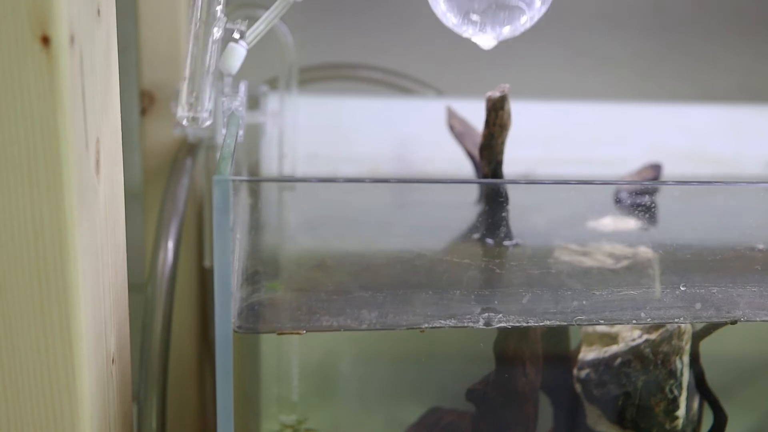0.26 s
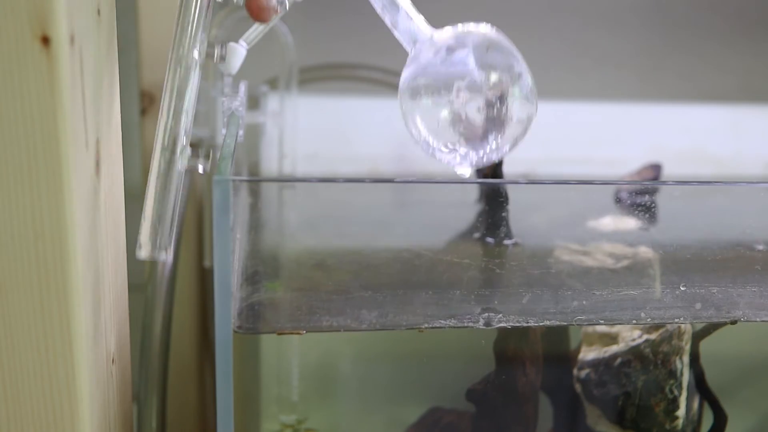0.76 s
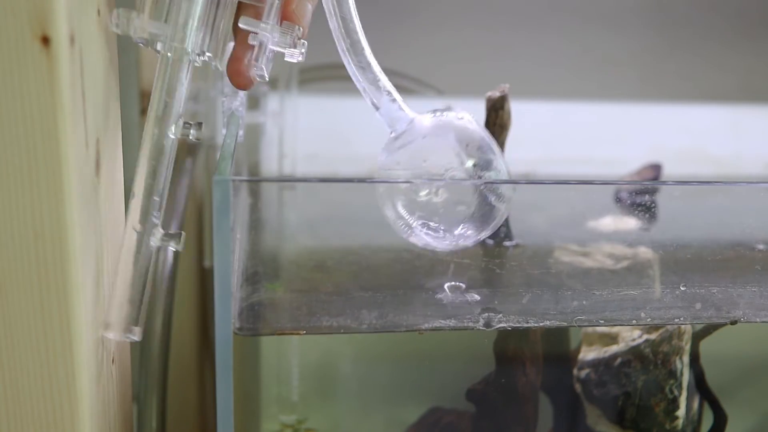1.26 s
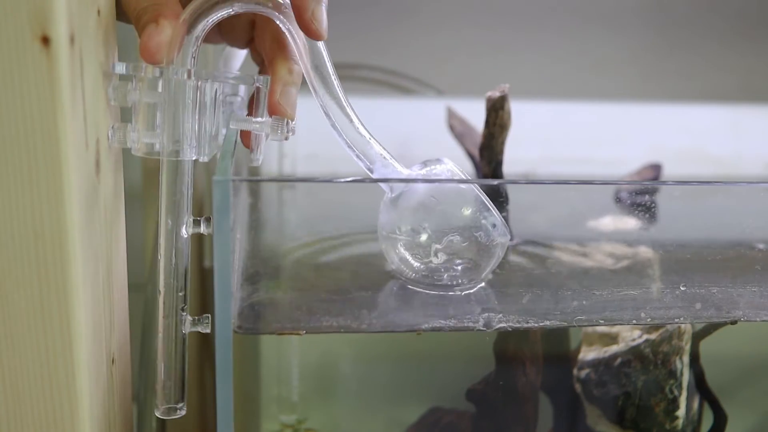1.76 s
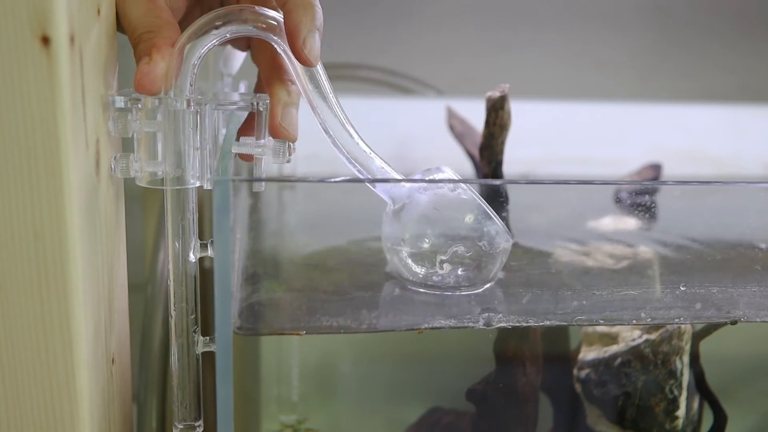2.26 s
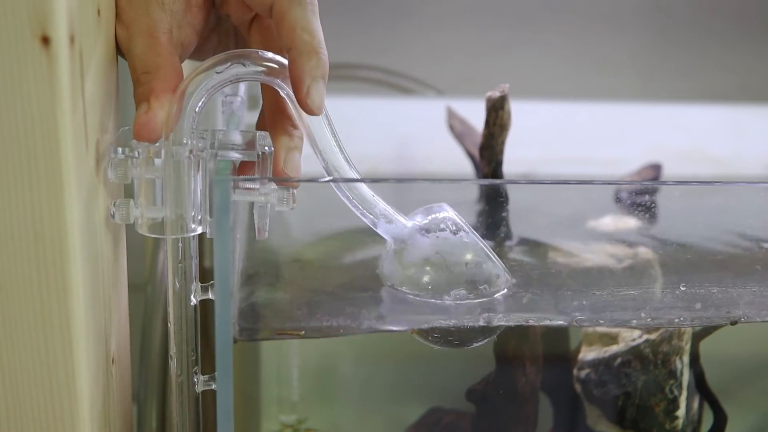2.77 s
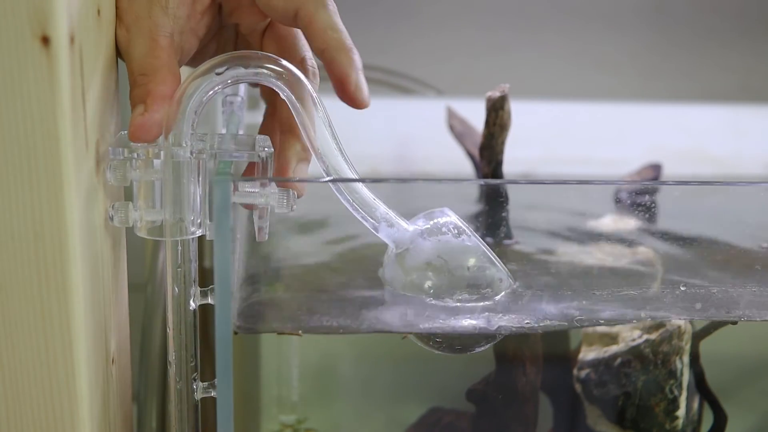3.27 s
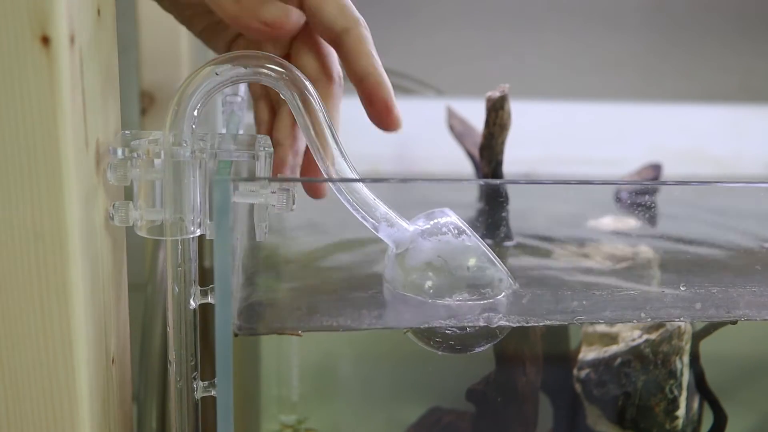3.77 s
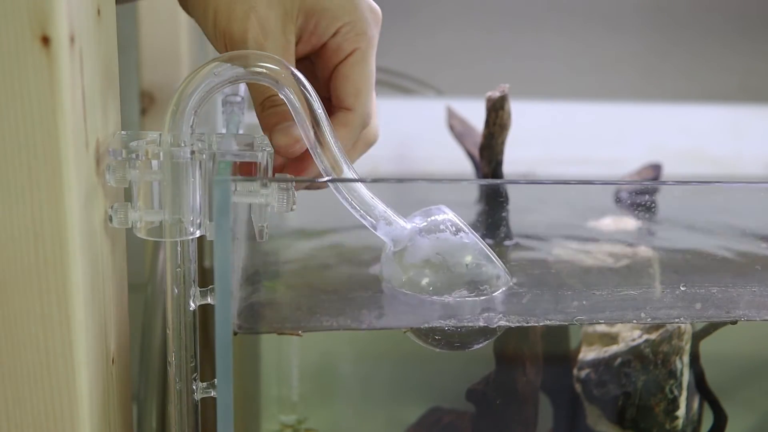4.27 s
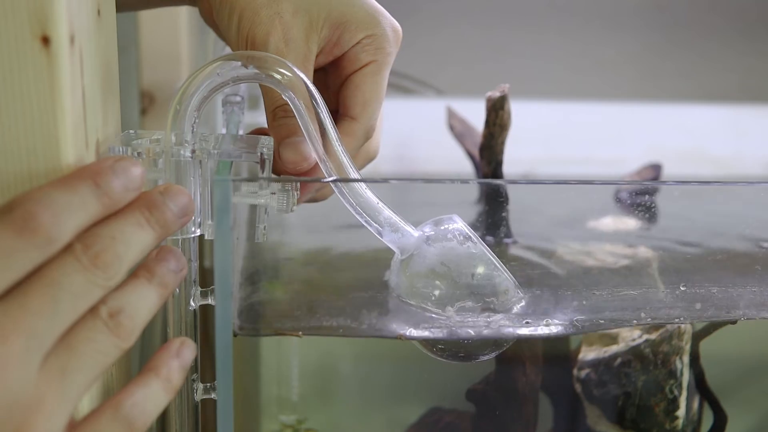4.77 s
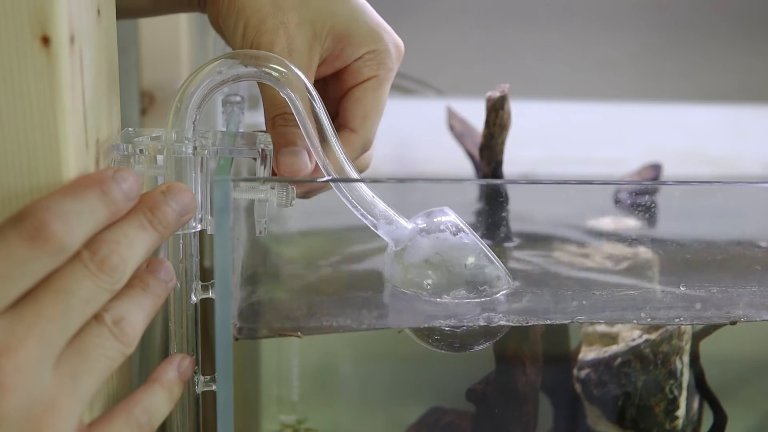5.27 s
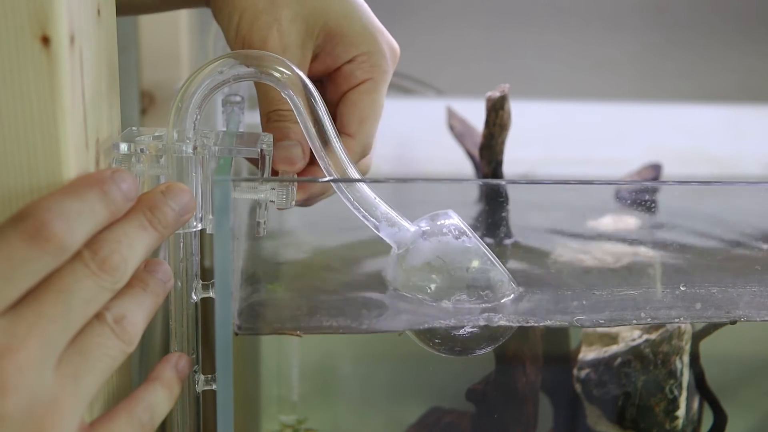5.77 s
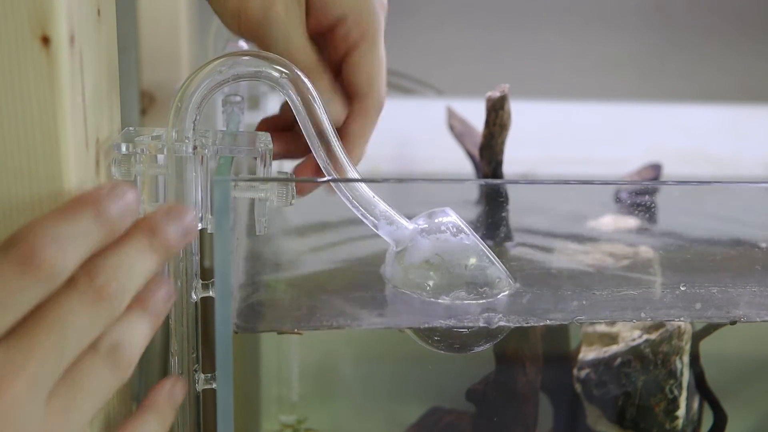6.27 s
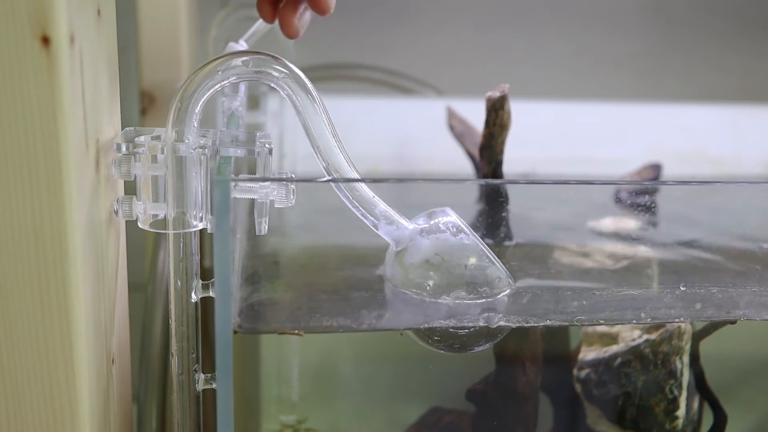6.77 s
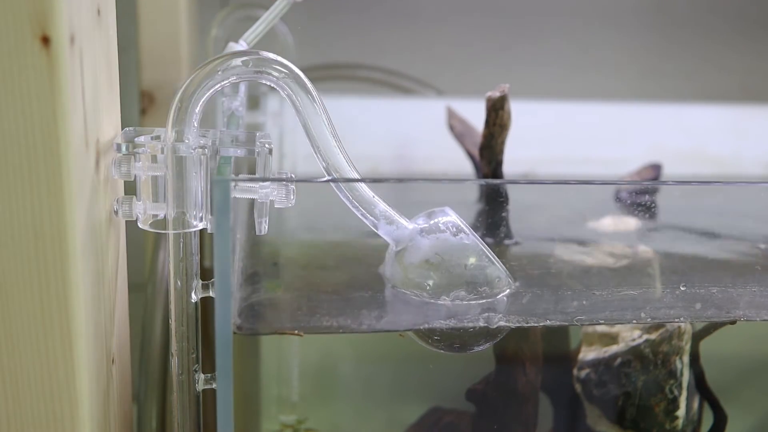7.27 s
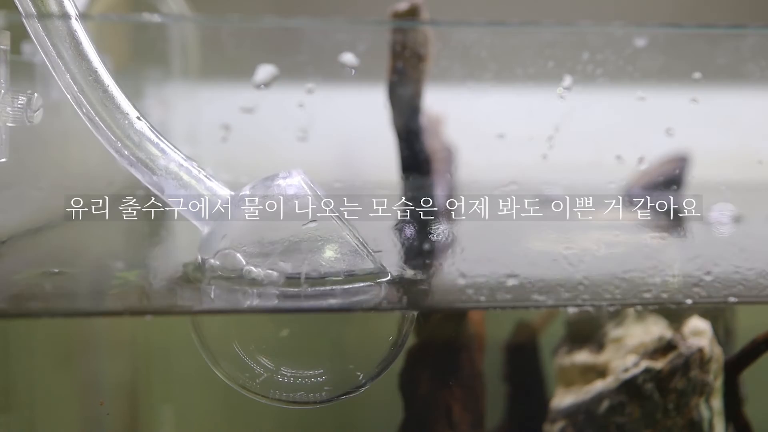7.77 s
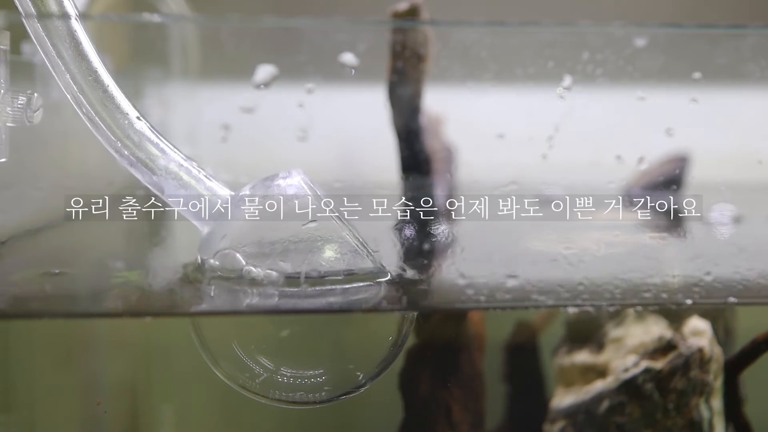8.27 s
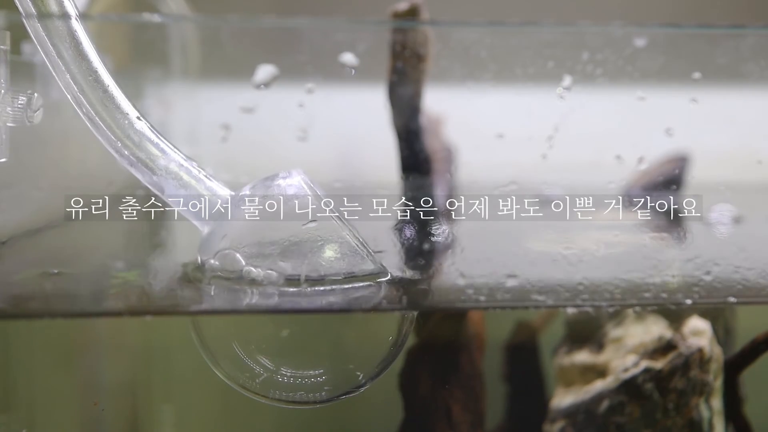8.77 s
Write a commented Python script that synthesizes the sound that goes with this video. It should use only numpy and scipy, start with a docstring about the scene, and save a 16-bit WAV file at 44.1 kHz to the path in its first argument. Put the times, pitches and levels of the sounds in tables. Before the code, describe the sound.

Close, small indoor room: a filter trickles continuously in ringing little bubbles and bright spray ticks above a quiet pump hum. A glass pipe in a hard plastic clamp knocks the tank rim in several rattly clicks during the first three and a half seconds. A brief screw squeak follows at about five seconds, two faint clicks at six, then a dull bump and airy water hiss begin near eight.

```python
"""A glass outflow pipe in a plastic clamp knocks on the rim of an aquarium; its screw squeaks once.
Knocks are noise cracks and decaying modes kept alive by a loose chatter; the squeak is a harmonic stack.
Nearby a filter trickles: gliding, ringing bubbles and bright ticks of noise. Pumps hum and murmur behind.
Near the end dull bumps on the stand are heard, with a hiss of air and water in the pipe (shaped noise).
Knocks, squeak, trickle and bumps get a short room; hum, murmur and flow are added without it."""
import sys
import numpy as np
from scipy import signal
from scipy.fft import rfft, irfft, next_fast_len
from scipy.io import wavfile

SR = 44100
rng = np.random.default_rng(int(sys.argv[2]) if len(sys.argv) > 2 else 0)


def file_out(sig):
    """Save sig as 16-bit WAV at sys.argv[1]."""
    # one column per channel
    cols = np.atleast_2d(sig).T
    # limit, then scale
    lim = np.clip(cols, -1, 1)
    pcm = np.round(lim * 32767).astype(np.int16)
    wavfile.write(sys.argv[1], SR, pcm)


N = 398223

# Steady mains hum lines. Each row: pitch in Hz, mean level in dB rms.
HUM_LINES = [(60, -60.5), (179.7, -71.5)]
# Slow course of the background. Each row: time in seconds, mean rumble level in dB,
# mean level of the second hum line in dB rms, murmur level in dB.
ROOM_COURSE = [(0.0, -63.5, -58, -54.5), (4.0, -66, -59, -53.5), (5.33, -66, -59.5, -54),
               (5.76, -59, -60, -53.5), (6.3, -67, -59.5, -54), (6.66, -59, -61.5, -54),
               (7.25, -72, -60.5, -53.5), (7.42, -54, -62, -54.5), (7.66, -57, -59.5, -52.5),
               (7.87, -66, -65, -52.5), (8.02, -61, -65, -44.5), (8.35, -67, -69, -52.5),
               (8.65, -64, -67, -51.5), (9.03, -59, -66, -52.5)]
# Spectrum of the murmur of pumps and air. Each row: frequency in Hz, relative level per Hz in dB.
MURMUR_SPECTRUM = [(76, -50), (130, -8), (225, -14), (430, -11), (495, -8.5), (822, -10), (986, -11),
                   (1310, -14), (1600, -11.5), (2050, -16.5), (3470, -19), (4890, -22), (12200, -27),
                   (15500, -28.5), (16500, -50)]
# Cabinet resonances in the murmur. Each row: centre in Hz, width in Hz, lift in dB.
CABINET_RESONANCES = [(498, 20, 4), (999, 40, 7)]
# Course of the flow in the pipe. Each row: time in seconds, hiss level in dB, low churning level in dB.
FLOW_COURSE = [(7.78, -71, -70), (7.838, -51.5, -64), (8.002, -48.5, -53.5), (8.566, -51, -62.5),
               (8.75, -55.5, -71), (9.03, -55, -74)]
# Spectrum of the hiss in the pipe. Each row: frequency in Hz, relative level per Hz in dB.
HISS_SPECTRUM = [(2060, -46), (3500, -17), (4020, -3), (4560, -8.5), (5210, 1.5), (5960, 0.5), (6340, 5),
                 (9130, -4), (10100, -15), (11000, -13.5), (15500, -20), (17000, -50)]

# Bumps on the stand. Each row: start in seconds, relative strength in dB, loudest frequency in Hz,
# fall away from there in dB per octave, extra for the large panel (second colour point) in dB.
STAND_BUMPS = [(7.841, -33, 150, 5, -10), (7.856, -33, 70, 4.5, -12), (7.992, -27.5, 710, 5.5, 8.5),
               (8.036, -36, 440, 22, 8), (8.062, -36, 1700, 4.5, 4)]
# Modes of the stand. Each row: nominal pitch in Hz, relative level in dB, 60 dB decay in seconds.
STAND_MODES = [(69, 6, 0.26), (117, 4.5, 0.2), (176.5, -1.5, 0.18), (444, 6, 0.064), (650, 2.5, 0.12),
               (985, 5, 0.055), (1150, 0, 0.056), (1565, 1, 0.057), (1710, -2.5, 0.043), (1974, 5, 0.031),
               (2360, 0, 0.038), (2670, -2.5, 0.061), (3110, -9, 0.056)]
# Points where the colour of a stand bump is set, in Hz.
STAND_COLOUR_HZ = [70, 120, 190, 440, 670, 1000, 2200]
# Thuds on the tank wall. Each row: start in seconds, relative strength in dB, loudest frequency in Hz,
# fall away from there in dB per octave, extra at the second colour point in dB.
TANK_THUDS = [(1.133, -32, 590, 7.9, 1.5), (1.365, -38.5, 800, 2.5, -26), (1.384, -41.5, 200, 3.5, -21),
              (1.65, -48, 200, 6, -16), (3.429, -48, 590, 9, 1), (3.457, -44, 590, 7, -3),
              (3.489, -59, 1100, 2.5, -9), (4.704, -48.5, 1100, 4.5, -8)]
# Modes of the tank wall. Each row: nominal pitch in Hz, relative level in dB, 60 dB decay in seconds.
TANK_MODES = [(196, 4, 0.089), (335, 3.5, 0.073), (490, -3.5, 0.11), (562.5, -1.5, 0.16), (637, -2, 0.081),
              (705, 0, 0.058), (1100, 2, 0.046), (1130, 4.5, 0.056), (1395, -5.5, 0.11)]
# Points where the colour of a tank thud is set, in Hz.
TANK_COLOUR_HZ = [200, 320, 590, 1100]

# Clearest ticks of bursting spray. Each row: start in seconds, relative level in dB,
# centre in Hz, 60 dB decay in seconds.
SPRAY_TICKS = [(0.208, -42, 6000, 0.09), (0.443, -40.5, 6000, 0.045), (0.9926, -43, 11600, 0.05),
               (2.2633, -35, 5870, 0.05), (2.9322, -40.5, 12600, 0.05), (4.704, -41.5, 7320, 0.045),
               (5.0382, -34.5, 9900, 0.17), (5.8621, -43.5, 10100, 0.05), (6.0521, -39, 8740, 0.035),
               (7.3083, -40, 6400, 0.041), (8.546, -29.5, 6500, 0.05), (8.7094, -40, 6300, 0.05)]
# Clearest bubbles of the trickle. Each row: start in seconds, relative level in dB, starting pitch in Hz.
CLEAR_BUBBLES = [(0.0582, -44, 3840), (0.2417, -44, 1680), (0.3674, -41.5, 2660), (0.5005, -31.5, 1930),
                 (0.6366, -43, 4090), (0.658, -40, 2580), (0.6856, -33, 2580), (0.7214, -40, 2200),
                 (0.8226, -42.5, 4180), (0.9093, -44, 3350), (0.9712, -41.5, 3400), (1.3276, -33.5, 2140),
                 (1.381, -37.5, 2570), (1.5374, -33, 2280), (1.566, -40, 3010), (1.5791, -36, 2000),
                 (1.6169, -41, 3100), (2.2271, -40, 3550), (2.2767, -31.5, 3400), (2.3693, -42, 3800),
                 (2.4028, -37, 4110), (2.4151, -32.5, 1870), (2.452, -39, 3200), (2.604, -33, 2570),
                 (2.7183, -33.5, 1450), (2.9065, -40, 3350), (3.2418, -38, 2610), (3.2687, -41, 1490),
                 (3.2778, -35, 2640), (3.5524, -41, 1630), (3.6624, -33.5, 2190), (3.6807, -37, 2980),
                 (3.7149, -37.5, 2420), (3.773, -42.5, 1400), (3.9205, -34.5, 2420), (3.9563, -36.5, 3360),
                 (4.0017, -37.5, 1520), (4.0265, -35.5, 2640), (4.089, -44, 3430), (4.1187, -30, 2160),
                 (4.1905, -35.5, 1860), (4.192, -44, 2720), (4.1925, -40, 1600), (4.2384, -44, 3450),
                 (4.2615, -38, 3500), (4.303, -35, 2690), (4.3856, -37, 2620), (4.4436, -34, 2580),
                 (4.4632, -35, 2090), (4.4857, -37.5, 1880), (4.5868, -37, 1900), (4.6905, -32.5, 2240),
                 (4.7054, -39, 3830), (4.7595, -45, 2200), (4.9162, -37, 2560), (4.9705, -37, 2380),
                 (5.0846, -43, 2220), (5.1603, -35, 2180), (5.174, -38, 3300), (5.2722, -37, 2520),
                 (5.4756, -41.5, 3520), (5.54, -43, 3650), (5.5913, -38.5, 3010), (5.6345, -45, 3670),
                 (5.7198, -45.5, 3610), (5.835, -43, 3500), (5.9034, -43, 1700), (5.9232, -41, 1550),
                 (6.2591, -32, 2640), (6.4416, -39, 2980), (6.5312, -32.5, 1850), (6.6655, -26.5, 2010),
                 (6.7826, -39, 2220), (6.7986, -35.5, 1490), (6.8391, -42, 3300), (6.9133, -42, 3480),
                 (6.94, -36.5, 2320), (7.0118, -31, 1690), (7.0367, -40, 2700), (7.071, -33, 3000),
                 (7.0979, -43, 4320), (7.2319, -39, 1770), (7.4763, -38.5, 3630), (7.4856, -35.5, 2600),
                 (7.5235, -34.5, 1535), (7.6137, -39.5, 3200), (7.8926, -34, 3450), (7.8965, -40, 1540),
                 (8.1609, -39, 2640), (8.3902, -38.5, 2810), (8.5111, -41.5, 1680), (8.5464, -38.5, 2244),
                 (8.5987, -45, 3040), (8.676, -33.5, 2250), (8.6825, -25, 852), (8.69, -33.5, 1455),
                 (8.7, -38, 2020), (8.7517, -41.5, 2250), (8.8075, -42, 2170), (8.8463, -35, 3020),
                 (8.8695, -33, 2200), (8.9489, -38.5, 3550), (9.003, -34.5, 2710), (9.0147, -32, 2700)]
# Partials of the screw's squeak. Each row: multiple of the pitch, peak level in dB.
SQUEAK_PARTIALS = [(1, -53), (2, -68), (3, -51), (4, -60), (5, -67)]
# Clamp and pipe against the glass. Each row: start in seconds, relative strength in dB, low body in dB
# re strength, ring of the pipe in dB re strength, fall of the treble in dB per octave.
CLAMP_KNOCKS = [(1.064, -19.5, -6, -3, 10), (1.1252, -30.5, 6, 4, 11), (1.1332, -16.5, -22, -11.5, 13),
                (2.0355, -27.5, -22, -4.5, 13.5), (2.0686, -30.5, -25, -9, 12),
                (2.0878, -36.5, -10, -12, 13), (2.1055, -29.5, -23, -8.5, 14.5), (2.135, -45, -7, -15, 21),
                (2.583, -29.5, 8.5, -4.5, 5.5), (2.6166, -16.5, -18, -3, 10), (2.6293, -21, -16.5, -16, 14),
                (2.65, -44, -6, -1.5, 9), (2.9928, -29.5, -35, -12, 15), (3.4316, -32.5, -12, -18, 21),
                (3.462, -31.5, -0.5, -14.5, 21), (3.5054, -34.5, -21, -12, 21), (6.1745, -33, -18, -13, 19),
                (6.19, -32.5, -14.5, -17, 20.5)]
# Modes of clamp and pipe. Each row: nominal pitch in Hz, relative level in dB, 60 dB decay in seconds.
CLAMP_MODES = [(967, 3, 0.037), (1293, 1, 0.1), (2174, -5, 0.036), (2590, -6.5, 0.033), (2730, -9.5, 0.027),
               (3050, 5, 0.018), (3860, 4.5, 0.028), (4200, -20, 0.041), (4600, 0, 0.014),
               (4850, -6.5, .04), (5720, 12.5, 0.025), (6630, -0.5, 0.047), (7430, 5, 0.04),
               (8300, 6, 0.028), (8900, -2, 0.025), (10200, -15, 0.053), (11900, -14.5, 0.031),
               (12100, -4, 0.036)]
# Points where the colour of a knock is set, in Hz: body, middle, peak, pipe, then two in the treble.
KNOCK_COLOUR_HZ = [1100, 2500, 3900, 5800, 8500, 12500]

SECOND_HUM_HZ, RUMBLE_WANDER_DB = 119.6, 2
# Cycles to fall 60 dB at 2 kHz; higher bubbles ring more cycles (power of pitch).
CYCLES_AT_2K, CYCLES_FOLLOW_PITCH = 48.8, 0.71
SQUEAK_S, SQUEAK_LENGTH_S, SQUEAK_HZ = 5.172, 0.038, 2504
# Knock level between body and peak; 60 dB decay of the loose parts' chatter.
KNOCK_MIDDLE_DB, RATTLE_T60_S = -3.5, 0.21
ECHO_S, ECHO_DB, ROOM_T60_S, ROOM_DB = .0068, -12.5, 0.24, -11.5
CUTOFF_HZ = 16700


def amp(db):
    """Decibels to gain."""
    return 10 ** (np.asarray(db) / 20)


def rms_one(x):
    """Scale to unit rms."""
    return x / np.sqrt(np.mean(x ** 2) + 1e-20)


def in_time(rows):
    """Columns of a course, drawn as straight lines with one value per sample."""
    s, *columns = np.transpose(rows)
    return [np.interp(np.arange(N) / SR, s, c) for c in columns]


def drift(rate_hz):
    """Slow random wander of spread 1: low-passed noise, drawn every 40 samples."""
    pole = np.exp(-2 * np.pi * rate_hz * 40 / SR)
    draws = rng.standard_normal(N // 40 + 2002)
    slow = signal.lfilter([1], [1, -2 * pole, pole * pole], draws)[2000:]   # settled part
    return np.interp(np.arange(N) / 40, np.arange(len(slow)), rms_one(slow))


def coloured(spectrum, patchy_db, peaks=()):
    """Noise with a spectrum and resonances; octaves flicker partly together, partly alone; rms 1."""
    size = next_fast_len(N, True)
    hz = np.fft.rfftfreq(size, 1 / SR) + 1   # keeps the logarithm finite
    points_hz, points_db = np.transpose(spectrum)
    gain = amp(np.interp(np.log(hz), np.log(points_hz), points_db, left=-90, right=-90))
    for centre_hz, width_hz, peak_db in peaks:
        gain = gain * amp(peak_db / (1 + (2 * (hz - centre_hz) / width_hz) ** 2))
    shaped = rfft(rng.standard_normal(size)) * gain
    together = drift(5.5)
    octave = np.log2(hz / 125)
    total = np.zeros(N)
    for k in range(8):
        overlap = np.clip(1 - abs(octave - k), 0, 1)
        band = irfft(shaped * overlap, size)[:N]
        total += band * amp(patchy_db * (0.46 * together + drift(24)))
    return rms_one(total)


def add(out, s, sound):
    """Mix a short sound in at s seconds."""
    i = round(s * SR)
    out[i:i + len(sound)] += sound[:max(N - i, 0)]


def ringing(hz, t60, rise_s, glide=0, size=8192):
    """Decaying sines, one row per mode, with a soft start; glide lifts the pitch as they die."""
    t = np.arange(size) / SR
    hz, t60 = np.reshape(hz, (-1, 1)), np.reshape(t60, (-1, 1))
    envelope = (1 - np.exp(-t / rise_s)) * amp(-60 * t / t60)
    return envelope * np.sin(2 * np.pi * hz * t * (1 + glide * t / t60))


def burst(band_hz, band_db, t60, rise_s, size=8192):
    """Coloured noise that starts quickly and dies."""
    hz, t = np.fft.rfftfreq(size, 1 / SR) + 1, np.arange(size) / SR
    edges_hz = [band_hz[0] / 1.6, *band_hz, band_hz[-1] * 1.4]
    colour_db = np.interp(np.log(hz), np.log(edges_hz), [-90, *band_db, -90])
    noise = irfft(rfft(rng.standard_normal(size)) * amp(colour_db))
    return noise * (1 - np.exp(-t / rise_s)) * amp(-60 * t / t60)


def strike(modes, band_hz, band_db, rise_s, size=8192):
    """One blow on a body: given colour, with chance in the strength, sign and pitch of each mode."""
    hz, level_db, t60 = np.transpose(modes)
    strength_luck, sign_luck, pitch_luck = rng.standard_normal((3, len(hz)))
    colour_db = np.interp(np.log(hz), np.log(band_hz), band_db)
    rings = ringing(hz * (1 + .008 * pitch_luck), t60, rise_s, size=size)
    gains = amp(level_db + colour_db + 1.5 * strength_luck) * np.sign(sign_luck)
    return gains @ rings


def background():
    """Mains hum as wandering sines, low rumble as band noise, murmur of pumps and air as coloured noise."""
    rumble_db, second_db, murmur_db = in_time(ROOM_COURSE)
    t = np.arange(N) / SR
    hum = np.zeros(N)
    for hz, level_db in [*HUM_LINES, (SECOND_HUM_HZ, second_db)]:
        hum += np.sqrt(2) * amp(level_db + .5 * drift(2.6)) * np.sin(2 * np.pi * hz * t)
    band = signal.butter(2, [39, 72], "band", fs=SR, output="sos")
    rumble = rms_one(signal.sosfilt(band, rng.standard_normal(N)))
    rumble = amp(rumble_db + RUMBLE_WANDER_DB * drift(1.2)) * rumble
    noise = coloured(MURMUR_SPECTRUM, 1.33, CABINET_RESONANCES)
    low = signal.sosfiltfilt(signal.butter(1, 2000, fs=SR, output="sos"), noise)
    murmur = amp(murmur_db) * low + amp(-56.5) * (noise - low)   # the treble does not follow the course
    return hum + rumble + murmur


def flow():
    """Air and water in the pipe: bright hiss and low churning noise, silent before the first row."""
    fade_in = np.clip((np.arange(N) / SR - FLOW_COURSE[0][0]) / .03, 0, 1)
    hiss_db, churning_db = in_time(FLOW_COURSE)
    band = signal.butter(2, [150, 300], "band", fs=SR, output="sos")
    churning = amp(churning_db) * rms_one(signal.sosfilt(band, rng.standard_normal(N)))
    hiss = amp(hiss_db) * coloured(HISS_SPECTRUM, 1.5, [(6200, 400, 3)])
    return fade_in * (hiss + churning)


def bumps(blows, modes, band_hz, ring_db, scuff_db):
    """Dull blows on a large body: its modes ring softly under a scuff of noise."""
    out = np.zeros(N)
    for s, strength_db, loudest_hz, fall_db, panel_db in blows:
        band_db = strength_db - fall_db * abs(np.log2(np.array(band_hz) / loudest_hz))
        band_db[1] += panel_db
        add(out, s, amp(ring_db) * strike(modes, band_hz, band_db, .0015))
        add(out, s, amp(scuff_db) * burst(band_hz, band_db, .12, .003))
    return out


def ticks(faint_db):
    """Bursting spray: bright noise that dies quickly; faint, shorter ticks come at random."""
    out = np.zeros(N)
    faint = [(u * N / SR, faint_db - 8 * v, 6000 + 8000 * w, .022) for u, v, w in rng.random((120, 3))]
    for s, level_db, hz, t60 in [*SPRAY_TICKS, *faint]:
        size = 4096 if t60 > .04 else 1024
        tick = burst([hz / 1.28, hz, hz * 1.125], [-5, 0, -5], t60, 0.00021, size=size)
        add(out, s, amp(level_db) * tick)
    return out


def bubbles(faint_per_s, faint_db, spray_db):
    """Each drop traps a ringing bubble, a neighbour and a puff of spray; faint ones come at random."""
    out, rise_s = np.zeros(N), .0007
    faint = []
    for when, level, pitch, chance in rng.random((500, 4)):   # about 55 candidates a second
        if chance < faint_per_s / 55:
            faint.append((when * N / SR, faint_db + 9 * (level - 1), 1900 * 2.3 ** pitch))
    for s, level_db, hz in [*CLEAR_BUBBLES, *faint]:
        u, v, w = rng.random(3)
        cycles = CYCLES_AT_2K * (hz / 2000) ** CYCLES_FOLLOW_PITCH
        bubble = ringing(hz, cycles / hz, rise_s, 0.031, size=2048)[0]
        add(out, s, amp(level_db) * bubble)
        neighbour = ringing(hz * (0.731 + 0.554 * u), 35 / hz, rise_s, 0.094, size=2048)[0]
        add(out, s + .012 * v, amp(level_db - 5.5 - 4.5 * w) * neighbour)
        spray = burst([hz / 1.47, hz, hz * 1.63], [-15, 0, -15], 0.044, rise_s, size=2048)
        add(out, s, amp(level_db + spray_db) * spray)
    return out


def squeak():
    """Regular stick-slip of the thread: a steady harmonic stack under a rounded envelope."""
    out, t = np.zeros(N), np.arange(round(SQUEAK_LENGTH_S * SR)) / SR
    stack = sum(amp(db) * np.sin(2 * np.pi * k * SQUEAK_HZ * t) for k, db in SQUEAK_PARTIALS)
    add(out, SQUEAK_S, stack * np.sin(np.pi * t / SQUEAK_LENGTH_S) ** 0.38)
    return out


def knocks():
    """Hard plastic and glass: a short crack, the modes, and a loose chatter that keeps exciting them."""
    out, t = np.zeros(N), np.arange(8192) / SR
    octaves_up = np.log2(np.array(KNOCK_COLOUR_HZ[4:]) / KNOCK_COLOUR_HZ[2])
    for s, strength_db, body_db, pipe_db, fall_db in CLAMP_KNOCKS:
        band_db = list(strength_db + np.r_[body_db, KNOCK_MIDDLE_DB, 0, pipe_db, -fall_db * octaves_up])
        contacts = rng.random(len(t)) < .04   # sparse random clicks
        chatter = rng.standard_normal(len(t)) * contacts * amp(-27.5 - 60 * t / RATTLE_T60_S)
        chatter[0] = 1   # the blow itself
        ring = strike(CLAMP_MODES, KNOCK_COLOUR_HZ, band_db, 0.00012, size=4096)
        add(out, s, amp(-10.0) * signal.fftconvolve(ring, chatter)[:len(t)])
        crack_hz, crack_db = [*KNOCK_COLOUR_HZ, 15500], [*band_db, band_db[-1] - 10]
        add(out, s, amp(9.5) * burst(crack_hz, crack_db, 0.027, 0.00022, size=2048))
        add(out, s, amp(-12) * burst(KNOCK_COLOUR_HZ, band_db, RATTLE_T60_S, 0.002))   # noisy tail
    return out


def room(x):
    """Direct sound, one echo off the near wall, then a tail of dying noise, duller than the source."""
    t = np.arange(SR // 2) / SR
    tail = rng.standard_normal(len(t)) * amp(-60 * t / ROOM_T60_S) * (1 - np.exp(-t / 0.00059))
    tail = signal.lfilter(*signal.butter(1, [300, 7000], "band", fs=SR), tail)
    response = amp(ROOM_DB) * tail / np.sqrt(np.sum(tail ** 2))
    response[0] = 1
    response[round(ECHO_S * SR)] += amp(ECHO_DB)
    return signal.fftconvolve(x, response)[:N]


def scene():
    """Near sounds through the room, over the background and the flow."""
    water = bubbles(faint_per_s=40, faint_db=-46, spray_db=4) + ticks(faint_db=-40.5)
    tank = bumps(TANK_THUDS, TANK_MODES, TANK_COLOUR_HZ, ring_db=1.0, scuff_db=12.5)
    stand = bumps(STAND_BUMPS, STAND_MODES, STAND_COLOUR_HZ, ring_db=-1.0, scuff_db=7)
    near = water + knocks() + tank + stand + squeak()
    return (room(near) + background() + flow())[None]


def record(dry):
    """One microphone channel, its top cut by a steep low-pass."""
    return signal.sosfilt(signal.cheby2(14, 60, CUTOFF_HZ, fs=SR, output="sos"), dry)


dry = scene()
out = record(dry)
file_out(out)
```